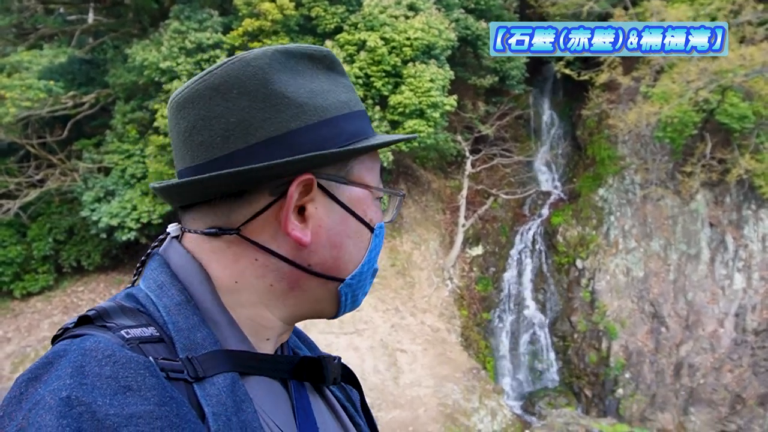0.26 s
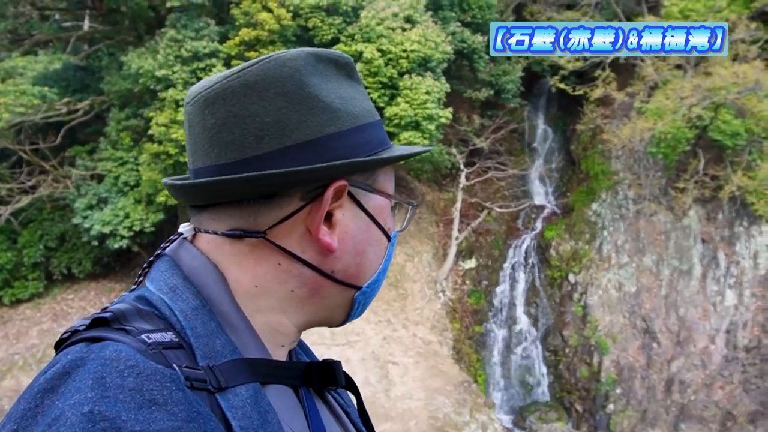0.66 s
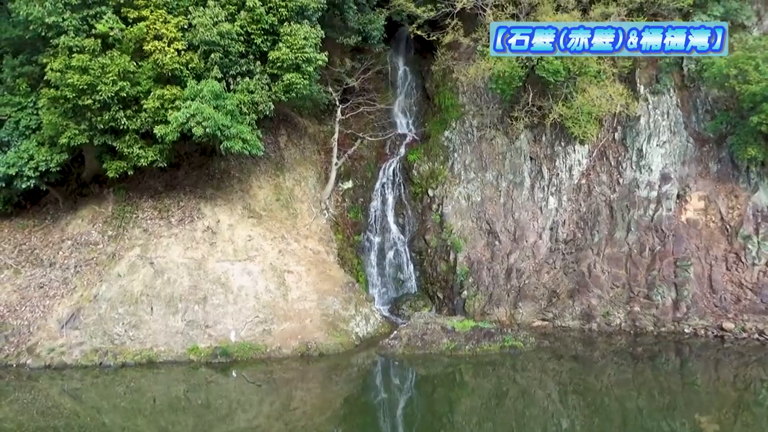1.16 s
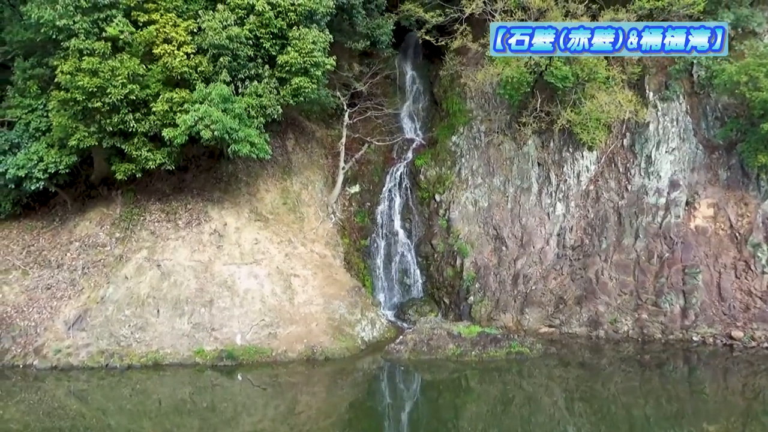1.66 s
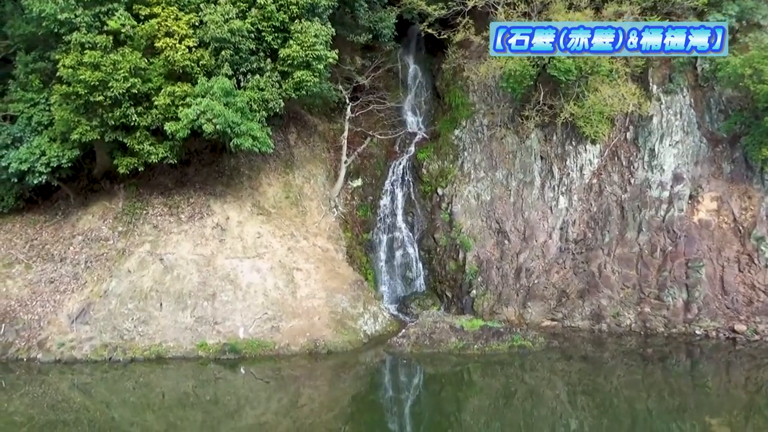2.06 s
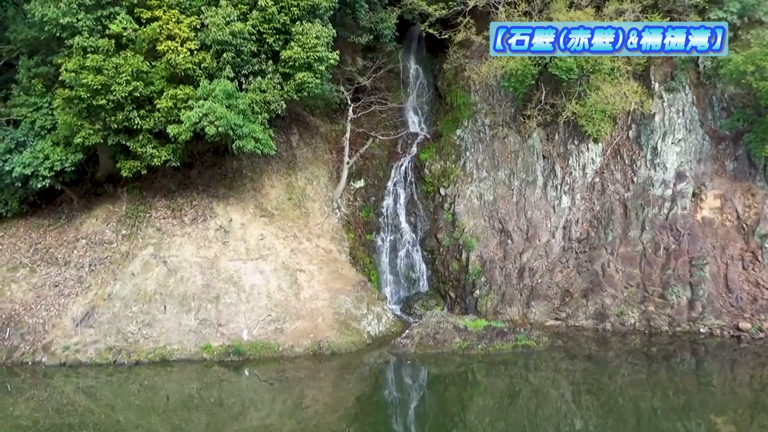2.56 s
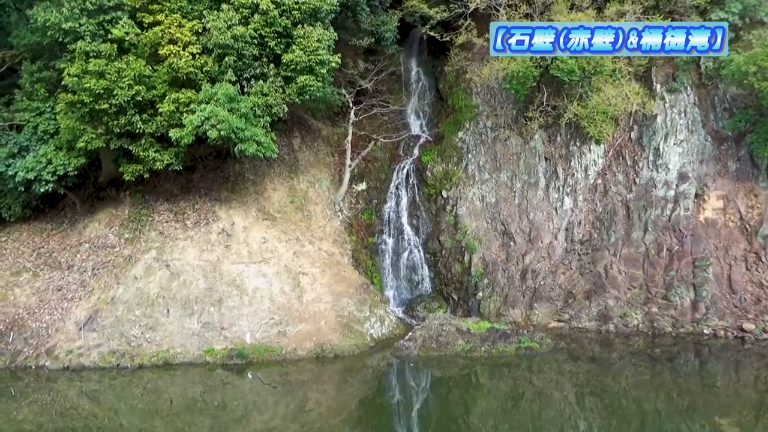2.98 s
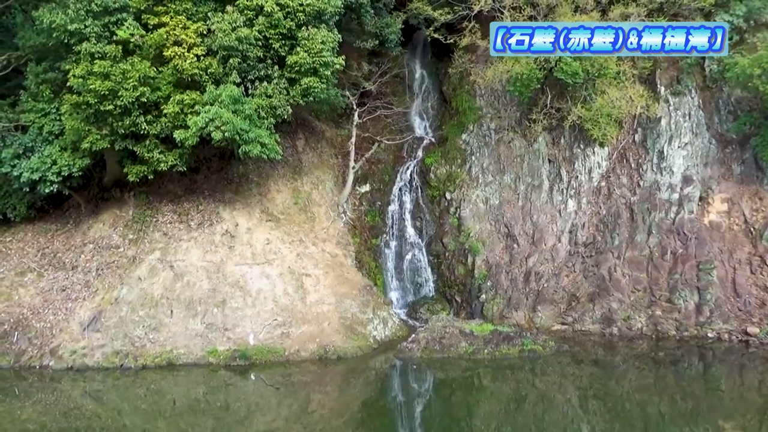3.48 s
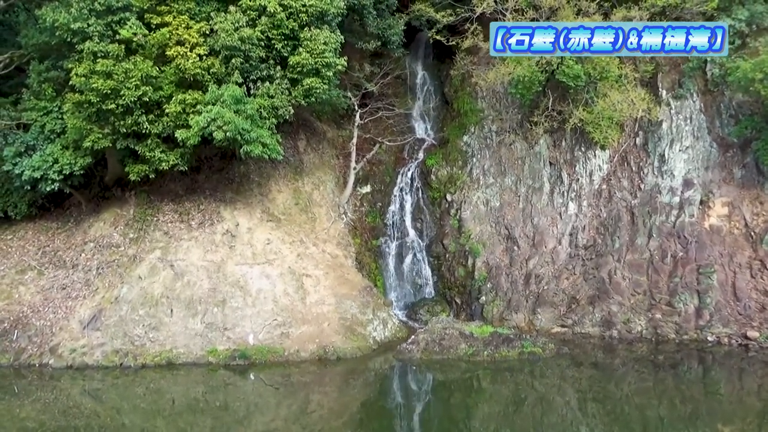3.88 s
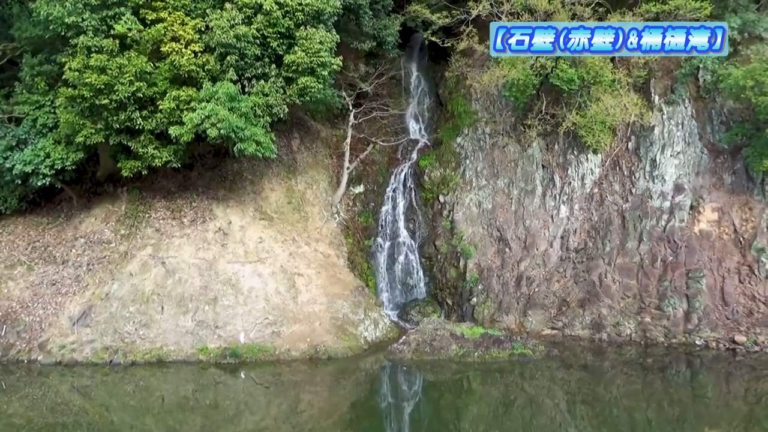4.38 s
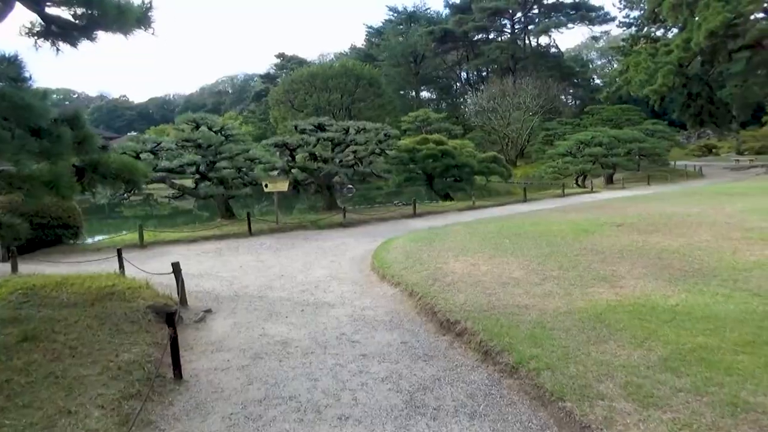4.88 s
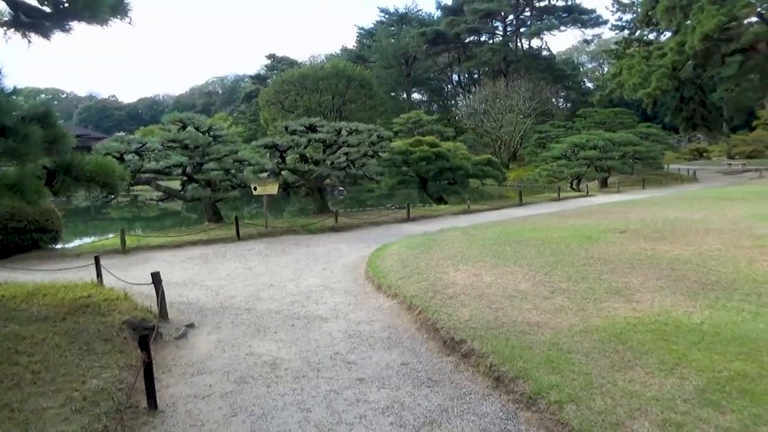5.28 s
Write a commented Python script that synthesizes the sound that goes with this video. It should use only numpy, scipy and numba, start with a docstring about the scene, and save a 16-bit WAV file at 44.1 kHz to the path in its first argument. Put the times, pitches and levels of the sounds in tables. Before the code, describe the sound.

The sound opens with the bright, fine patter of a thin waterfall on rock, slightly to the right. At about 0.8 seconds it dips briefly and blends into a fuller, centred rush of the cascade heard across a pond, made of tiny splashes, bubbles and spray. This rush grows gradually louder, with small gurgling gushes, over a faint town rumble and the low hum of a far motor. Around 4.8 seconds it dips again and gives way to softer running water a little to the left of a garden path. A distant bird gives one short, high chirp on the left at about 4.9 seconds. From 5.2 to 5.5 seconds a nearby shoe lands on gravel with a soft thud, a crunch and a few sharp pebble clicks. The water continues to the end, and everything is fairly quiet.

```python
"""A bright patter of water on rock comes first: a thin cascade running down into a garden pond.
It crossfades to the fuller rush across the pond, over town rumble and a far motor, then to running
water beside a gravel path, where a bird chirps once and a shoe thuds, crunches and snaps pebbles.
The water is a crowd of tiny splashes and ringing air bubbles in a haze of spray."""
import sys
import numpy as np
from scipy import signal
from scipy.fft import rfft, irfft
from scipy.io import wavfile
from scipy.ndimage import uniform_filter1d
from numba import njit

SR = 44100
rng = np.random.default_rng(int(sys.argv[2]) if len(sys.argv) > 2 else 0)


def digitize_waveform(pressure):
    """Quantize a signal to 16-bit integers and store it at the path in sys.argv[1].

    Rows of a 2-D input are taken as channels; values are limited to [-1, 1].
    """
    field = np.atleast_2d(pressure).T
    bounded = np.clip(field, -1, 1)
    quanta = np.round(bounded * 32767).astype(np.int16)
    wavfile.write(sys.argv[1], SR, quanta)


N = 244049
TIME = np.arange(N) / SR
FREQ = np.maximum(np.arange(N // 2 + 1) * SR / N, 1)

# tone of the distant town's rumble: (frequency [Hz], relative level [dB])
TOWN_EQ = [(25, -30), (48, -33), (60, -20), (72, -8), (92, 1), (108, 0), (130, 3.5), (190, 3.5), (260, 2.5),
           (400, -20), (800, -43)]
# dull swells in the rumble: (time [s], centre [Hz], half-width [s], level [dB])
TOWN_SWELLS = [(2.798, 195, 0.045, -65.5), (3.504, 242, 0.04, -62.5), (4.1, 123, .041, -61)]
# thin hiss that opens each spot, ahead of the crossfades:
# (time [s], centre [Hz], bandwidth [Hz], half-width [s], level [dB], left minus right [dB])
OPENING_HISSES = [(0, 12750, 1000, .36, -72, -6), (.8, 12900, 1600, .5, -66.5, 0),
                  (4.8, 10000, 1900, 0.16, -63, -10)]
# a shoe presses into gravel: (time [s], half-width [s], thud level [dB], crunch level [dB])
SHOE_CONTACTS = [(5.221, 0.014, -60.5, -66), (5.295, 0.04, -71, -51), (5.362, 0.0035, -57, -46),
                 (5.473, 0.02, -72, -50)]
# hollow knock of the sole: (pitch [Hz], level against the thud [dB], time to fall 60 dB [s])
SOLE_MODES = [(374, 4.5, .07), (800, 5, .04), (1240, -1, .05)]
# tone of grinding gravel: (frequency [Hz], relative level [dB])
GRAVEL_EQ = [(900, -4), (2000, 3), (3000, 2), (4000, -5), (5200, 5.5), (6500, -24), (13000, -28),
             (15000, -60)]
# pebbles snap under the shoe: (time [s], centre [Hz], level before the band-pass [dB])
PEBBLE_SNAPS = [(5.3458, 3000, -42.5), (5.3603, 2200, -37), (5.3648, 3600, -33)]
# tone of the water on the rock, across the pond and by the path: (frequency [Hz], relative level [dB])
ROCK_EQ = [(40, -60), (100, -54), (200, -42), (290, -35), (400, -26.5), (700, -17.5), (1200, -7),
           (2200, 1.5), (3300, 1), (4600, 0), (6500, -6), (9000, -12.5), (10500, -15.5), (11800, -23.5),
           (13300, -25), (15000, -48)]
POND_EQ = [(300, -13.5), (470, -14.5), (680, -6.5), (1060, -7), (1300, -2.5), (1480, -3), (1750, 0.5),
           (2300, -1.5), (3000, -4.5), (4700, -8.5), (5800, -13.5), (7000, -12.5), (9000, -17),
           (11000, -13.5), (12200, -23.5), (13500, -30.5), (15300, -42.5)]
PATH_EQ = [(115, -15.5), (220, -13), (290, -15.5), (390, -5.5), (480, -10.5), (620, -5.5), (1000, -8),
           (1500, 1.5), (1950, 4), (3000, 0.5), (4700, -4), (6500, -8), (10300, -20.5), (12200, -31),
           (13300, -40), (14500, -62)]
# the rush swells or ebbs briefly: (time [s], half-width [s], gain [dB])
RUSH_SURGES = [(1.233, .04, -1), (1.73, .03, -0.2), (2.0, 0.018, -0.5), (2.3, 0.068, 0.5),
               (2.63, .05, -0.5), (3.11, 0.13, 1), (3.306, 0.028, -1.5), (3.722, 0.1, -0.4),
               (4.08, 0.041, 1.3), (4.393, 0.054, 0.7), (4.55, 0.064, -2)]
# gushes plunge into the pond: (time [s], pitch [Hz], half-width [s], level against the rush [dB])
POND_GUSHES = [(1.3, 2150, .012, -5), (1.64, 1950, .025, -6), (2.075, 1780, .02, -6.5),
               (2.44, 2150, .015, -10), (2.765, 1780, .016, -5.5), (2.983, 1850, .03, -7),
               (3.13, 1850, .04, -7), (4.16, 1800, .08, -7.5), (4.453, 2150, 0.025, -4.5),
               (4.597, 1850, .025, -8)]
# rock to pond, then pond to path: (midpoint [s], length [s], gain of each spot at the midpoint [dB])
SPOT_CROSSFADES = [(.778, 0.15, -18), (4.787, 0.33, -18.5)]


def undb(db):
    """Decibels to gain."""
    return 10 ** (np.asarray(db) / 20)


def unit_rms(x):
    """Scale x to rms 1."""
    return x / np.sqrt(np.mean(x ** 2))


def sides(pan_db):
    """Left and right gains; a positive pan favours the left."""
    return undb(np.array([[pan_db], [-pan_db]]) / 2)


def bell(time, half_width):
    """A smooth rise and fall that peaks at 1; half_width is its standard deviation in seconds."""
    return np.exp(-.5 * ((TIME - time) / half_width) ** 2)


def drift(rate_hz):
    """Random modulation: sample-and-hold, smoothed twice; rms 1."""
    hold = int(SR / rate_hz)
    held = np.repeat(rng.standard_normal(N // hold + 1), hold)
    return unit_rms(uniform_filter1d(uniform_filter1d(held, hold), hold)[:N])


def narrow(x, hz, width_hz):
    """Keep one bell-shaped band of x; rms 1."""
    return unit_rms(irfft(rfft(x) * np.exp(-2 * ((FREQ - hz) / width_hz) ** 2), N))


def noise_band(hz, width_hz):
    """Noise in one bell-shaped band; rms 1."""
    return narrow(rng.standard_normal(N), hz, width_hz)


def colour(x, eq):
    """Flatten the spectrum of x, then shape it to an EQ curve with the lows rolled off; rms 1."""
    hz, db = np.transpose(eq)
    spectrum = rfft(x)
    envelope = np.sqrt(uniform_filter1d(np.abs(spectrum) ** 2, size=1500))
    curve = undb(np.interp(np.log(FREQ), np.log(hz), db))
    low_cut = np.minimum(FREQ / hz[0], 1) ** np.pi
    return unit_rms(irfft(spectrum / envelope * curve * low_cut, N))


def widen(x, eq, wide_hz, pan_db, lead_ms):
    """Close stereo pair: scattered sound widens the treble; a positive lead puts the left first."""
    mid = rfft(x)
    side = rfft(colour(rng.standard_normal(N), eq)) * (FREQ / wide_hz) ** 0.84
    lead = np.exp(1j * np.pi * FREQ * lead_ms / 1000)
    return irfft(np.array([(mid + side) * lead, (mid - side) / lead]), N) * sides(pan_db)


def fade(crossfade, rising):
    """Gain of the spot that comes in (rising) or goes out, at an even rate in dB."""
    midpoint, length, dip_db = crossfade
    past = (TIME - midpoint) / (length / 2)
    return undb(dip_db * np.maximum(1 - past if rising else 1 + past, 0))


def impacts(per_s, scatter_db):
    """Tiny clicks at random moments, most weak and a few strong; rms 1."""
    hits = (rng.random(N) < per_s / SR) * rng.standard_normal(N)
    return unit_rms(hits * undb(scatter_db * np.clip(rng.standard_normal(N), -2, 2)))


def town_rumble():
    """The low noise bed of a distant town; rms 1."""
    return colour(rng.standard_normal(N), TOWN_EQ)


def town_swells():
    """Short, dull lifts in the rumble."""
    return sum(noise_band(hz, hz / 3) * undb(db) * bell(time, half_width)
               for time, hz, half_width, db in TOWN_SWELLS)


def motor_hum(hz=143, db=-73.5, waver_db=3):
    """A far motor holds one low tone that wavers in pitch and level."""
    phase = 2 * np.pi * np.cumsum(hz + drift(4.9)) / SR
    return np.sin(phase) * undb(db + waver_db * drift(4.05))


def hiss(time, hz, width_hz, half_width, db, pan_db):
    """A thin, high hiss that peaks at the given time and dies away."""
    return noise_band(hz, width_hz) * bell(time, half_width) * undb(db) * sides(pan_db)


def bird(middle_s=4.931, length_s=.1, top_hz=3700, arch_hz=476, waver_hz=16):
    """A far bird whistles one note on the left; pitch and level rise and fall in a single arch."""
    droop = np.minimum(((TIME - middle_s) / (length_s / 2)) ** 2, 1)
    hz = top_hz - arch_hz * droop + waver_hz * drift(200)
    whistle = np.sin(2 * np.pi * np.cumsum(hz) / SR)
    return whistle * (1 - droop) * undb(-50.5) * sides(pan_db=9)


def sole_knock(time, give_s):
    """The sole lands with a soft attack and rings briefly."""
    age = np.maximum(TIME - time, 0)
    attack = np.where(TIME < time, bell(time, give_s), 1)
    return attack * sum(undb(db - 60 * age / t60) * np.sin(2 * np.pi * hz * (TIME - time))
                        for hz, db, t60 in SOLE_MODES)


def shoe_on_gravel(give_s=.003):
    """On the left, a sole knocks, thuds into the ground and grinds pebbles together."""
    crunch = colour(impacts(per_s=11000, scatter_db=-1.0), GRAVEL_EQ)
    crunch = widen(crunch, GRAVEL_EQ, wide_hz=14000, pan_db=1, lead_ms=.015)
    thud = undb(-2.5) * noise_band(520, 180) + undb(1.5) * noise_band(950, 550)
    out = np.zeros((2, N))
    for time, half_width, thud_db, crunch_db in SHOE_CONTACTS:
        out += undb(crunch_db) * crunch * bell(time, half_width)
        # the ground gives, so the thud outlasts the crunch
        body = thud * bell(time, half_width + give_s) + sole_knock(time, give_s)
        out += undb(thud_db) * body * sides(pan_db=6)
    return out


def pebble_snaps(t60_s=0.015, range_hz=(500, 6000), left_lead_ms=0.039):
    """Single pebbles strike each other under the shoe: sharp attack, very short ring, no bass."""
    snaps = np.zeros(N)
    for time, hz, db in PEBBLE_SNAPS:
        decay = undb(-60 * np.maximum(TIME - time, 0) / t60_s) * (TIME >= time)
        snaps += noise_band(hz, width_hz=3300) * undb(db) * decay
    snaps = signal.sosfilt(signal.butter(4, range_hz, "bandpass", fs=SR, output="sos"), snaps)
    lead = np.exp(1j * np.pi * FREQ * left_lead_ms / 1000)
    return irfft(rfft(snaps) * np.array([lead, 1 / lead]), N) * sides(pan_db=2)


@njit
def bubble_rings(starts, pitches, cycles, gains, rise):
    """Damped sines that glide up as each bubble nears the surface; 60 dB down after its cycles."""
    out = np.zeros(N)
    for k in range(len(starts)):
        length = int(cycles[k] * SR / pitches[k]) + 1
        phase = 0.
        for i in range(min(length, N - starts[k])):
            age = i / length
            phase += 2 * np.pi * pitches[k] * (1 + rise * age) / SR
            out[starts[k] + i] += gains[k] * np.exp(-6.9 * age) * np.sin(phase)
    return out


def bubbles(hz, cycles, scatter_db, count=7000):
    """Trapped air rings at a pitch set by its size, spread about an octave around hz; rms 1."""
    when, smallness, life, force = rng.random((count, 4)).T
    starts = (when * N).astype(np.int64)
    pitches = np.clip(hz * (smallness / (1 - smallness)) ** .3, 350, 9000)
    gains = undb(-scatter_db * np.log(1 - .98 * force)) * np.sqrt(pitches / hz)
    return unit_rms(bubble_rings(starts, pitches, cycles * (.5 + life), gains, rise=0.15))


def water(eq, bubble_db, splash_db, surge_db):
    """Bubbles and splashes mixed against a haze of spray; the uneven flow makes the level flutter."""
    gurgle = bubbles(1898.5, cycles=51, scatter_db=1.5) * undb(bubble_db + 0.55 * drift(14))
    splashes = impacts(per_s=14000, scatter_db=2) * undb(splash_db + 0.5 * drift(45))
    spray = rng.standard_normal(N)
    return colour(gurgle + splashes + spray, eq) * undb(surge_db * drift(30.04))


def gushes():
    """Each gush throws up a brief cloud of like-sized bubbles that colours the rush."""
    cloud = bubbles(1912, cycles=110, scatter_db=1)
    return sum(narrow(cloud, hz, width_hz=640) * undb(db) * bell(time, half_width)
               for time, hz, half_width, db in POND_GUSHES)


def pond_reflection(x, delay_s=.00228, echo_db=-16, cutoff_hz=2200):
    """Add the bounce off the pond: ripples scatter the treble, so only the lows echo; rms 1."""
    echo = undb(echo_db) * np.exp(-2j * np.pi * FREQ * delay_s - (FREQ / cutoff_hz) ** 2)
    return unit_rms(irfft(rfft(x) * (1 + echo), N))


def path_spot(db=-46):
    """Running water to the left of the path, over a low drone."""
    stream = water(PATH_EQ, bubble_db=-9, splash_db=-2.5, surge_db=0)
    drone = noise_band(184, 45) * undb(-24)
    stream = widen(stream, PATH_EQ, wide_hz=14000, pan_db=3, lead_ms=0.0089)
    return (stream + drone) * undb(db)


def rock_spot(start_db=-46, ebb_db_per_s=0.8):
    """Bright patter of water on rock, a little to the right, easing off slowly."""
    patter = water(ROCK_EQ, bubble_db=-14, splash_db=-8.5, surge_db=0.5)
    patter = widen(patter, ROCK_EQ, wide_hz=64500, pan_db=-2.5, lead_ms=-.003)
    rumble = town_rumble() * undb(-42 - 25 * TIME)  # just a trace, soon gone
    return (patter + rumble) * undb(start_db - ebb_db_per_s * TIME)


def pond_spot(entry_db=-49, rise_db_per_s=1.9656):
    """The cascade dead centre across the pond, building along with the town rumble over the far hum."""
    rush = pond_reflection(water(POND_EQ, bubble_db=-13, splash_db=-6, surge_db=0.22))
    rush *= undb(sum(db * bell(time, half_width) for time, half_width, db in RUSH_SURGES))
    rumble = town_rumble() * undb(-22.5 + 0.24 * drift(5.6))
    backdrop = motor_hum() + town_swells()
    entry_s = SPOT_CROSSFADES[0][0]
    build = undb(entry_db + rise_db_per_s * (TIME - entry_s))
    return (rush + gushes() + rumble) * build + backdrop


def scene():
    """Rock, pond and path crossfade in turn; the bird and the shoe come in at the path."""
    to_pond, to_path = SPOT_CROSSFADES
    rock_hiss, pond_hiss, path_hiss = (hiss(*row) for row in OPENING_HISSES)
    rock = (rock_spot() + rock_hiss) * fade(to_pond, rising=False)
    pond = (pond_spot() + pond_hiss) * fade(to_pond, rising=True) * fade(to_path, rising=False)
    path = (path_spot() + path_hiss + bird()) * fade(to_path, rising=True)
    return rock + pond + path + shoe_on_gravel() + pebble_snaps()


def record(dry):
    """A brief fade closes the sound and a steep low-pass trims the top."""
    fade_out_s, top_hz = 0.0023, 15400
    closing = np.minimum((TIME[-1] - TIME) / fade_out_s, 1)
    return signal.sosfilt(signal.ellip(8, .2, 70, top_hz, fs=SR, output="sos"), dry * closing)


dry = scene()
out = record(dry)
digitize_waveform(out)
```